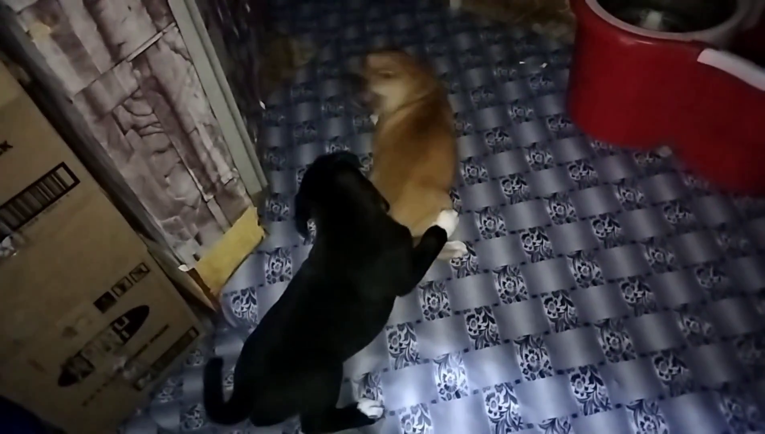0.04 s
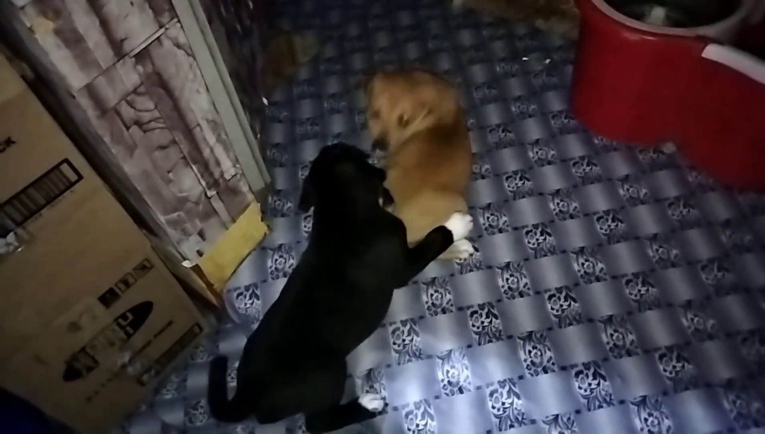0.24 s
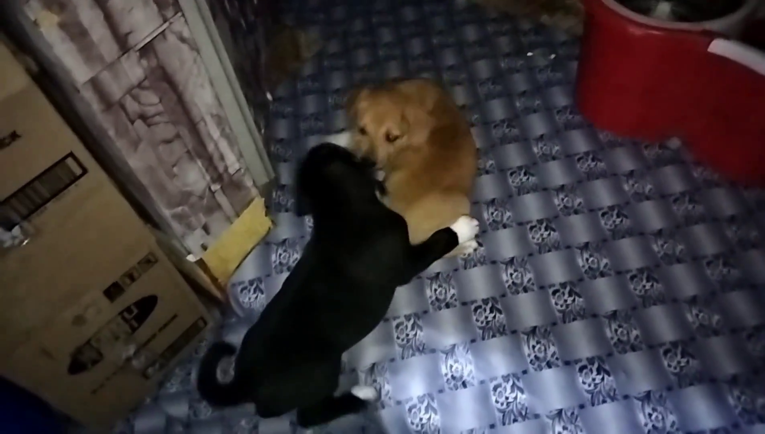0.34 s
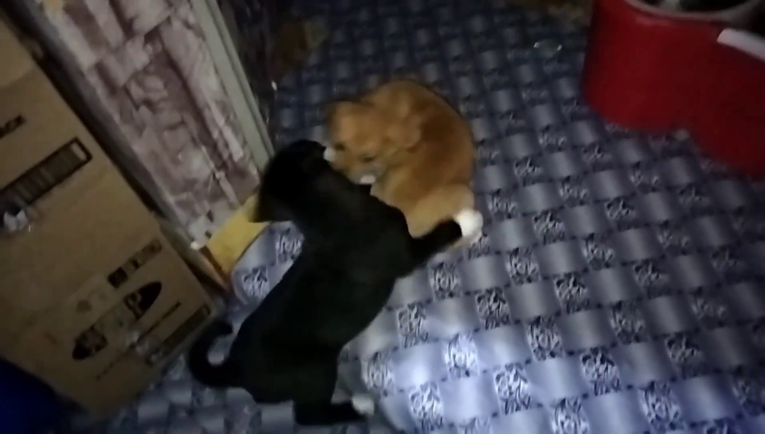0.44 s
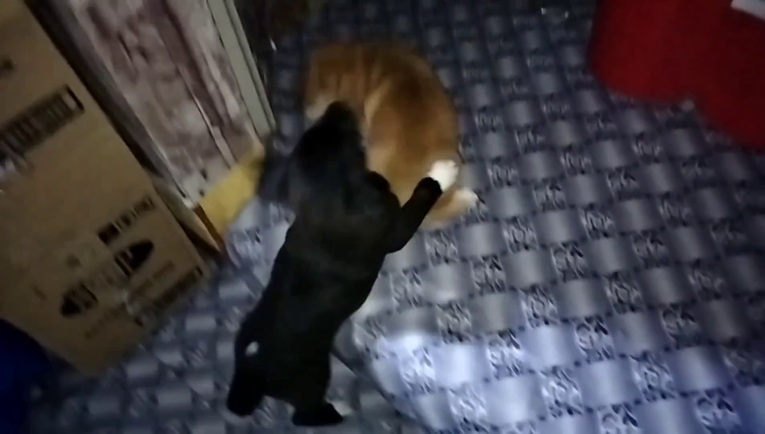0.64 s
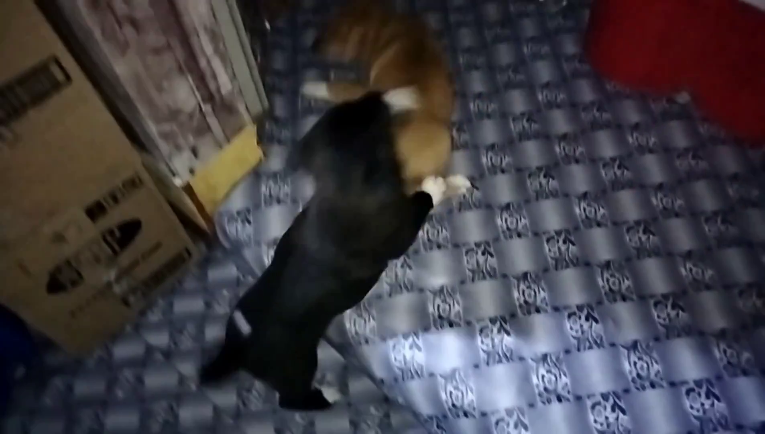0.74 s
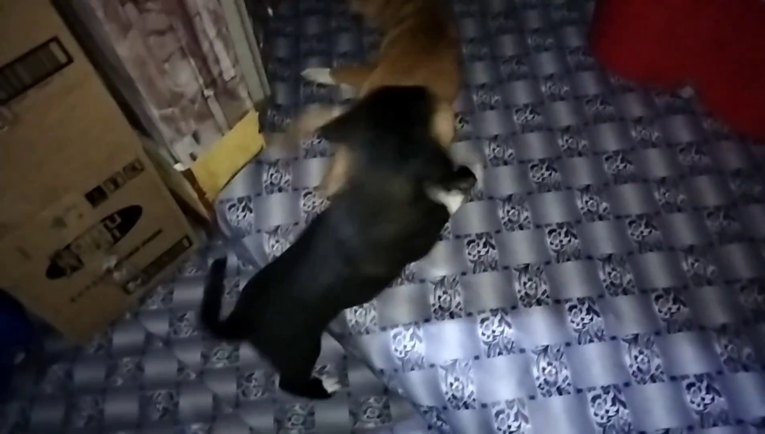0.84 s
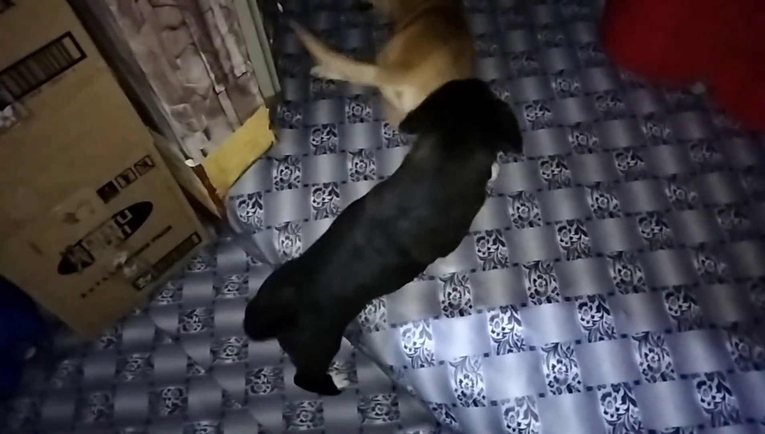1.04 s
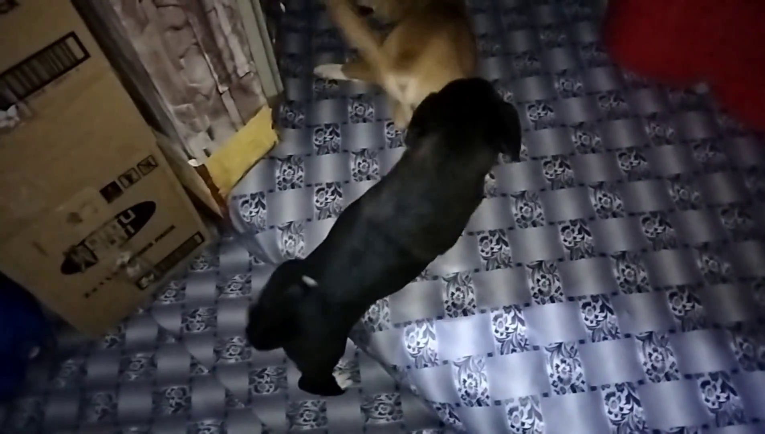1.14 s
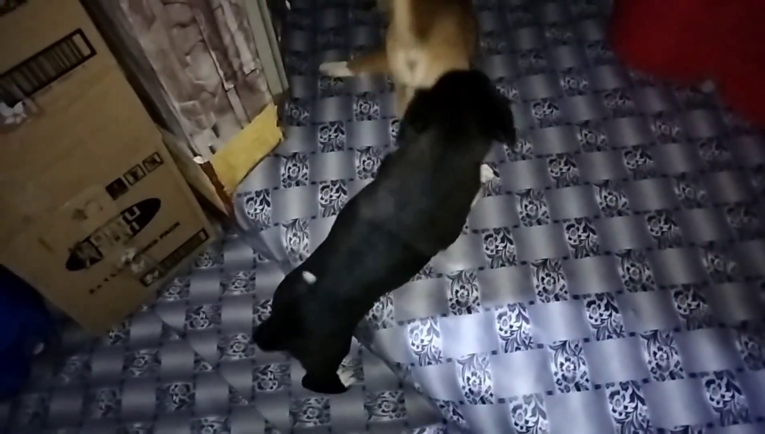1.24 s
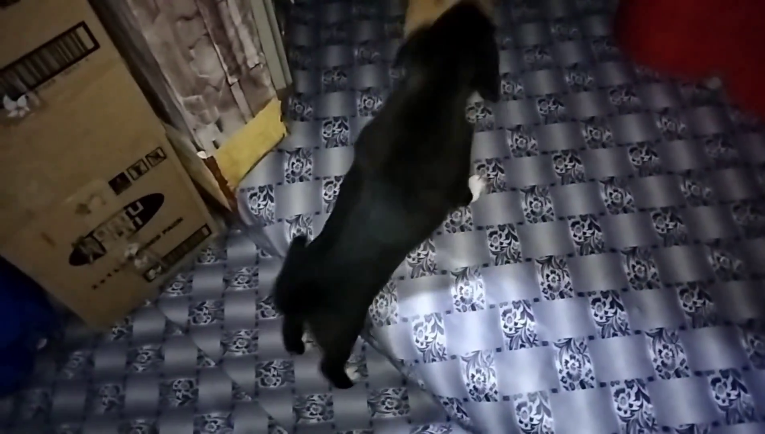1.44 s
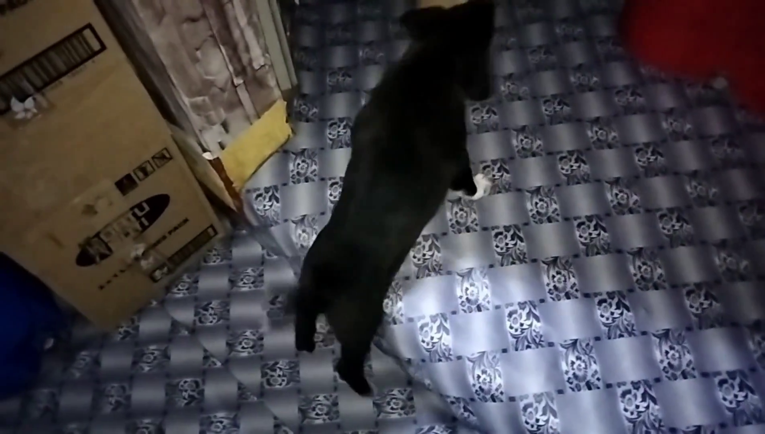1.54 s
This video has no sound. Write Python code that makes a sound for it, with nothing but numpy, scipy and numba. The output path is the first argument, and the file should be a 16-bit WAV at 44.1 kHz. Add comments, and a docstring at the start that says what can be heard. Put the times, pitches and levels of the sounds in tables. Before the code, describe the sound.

A dog's loud, raspy yip bursts out at about 0.2 seconds and is over by 0.33, falling slightly in pitch. A much quieter, rattling growl runs from 0.5 to 0.8, then an airy gasp with a low dog murmur, and a softer growl from 1.0 to 1.27. Faint scuffs and claw ticks dot the floor throughout, over soft room hiss and low hum, with short reflections.

```python
"""Dogs wrestling indoors

Two dogs on a vinyl floor in a small room, close to a phone: one rasping yip, then two rough growls
with a gasp of air and a low murmur between them. Voices are uneven fold pulses and breath through
gliding resonances; paws and fur scuff as gritty shaped noise; claws tick as short noise bursts.
Shaped hiss and wavering sines make the room tone and mains hum; decaying noise makes the reflections.
"""
import sys
import numpy as np
from scipy import signal
from scipy.fft import rfft, irfft, next_fast_len
from scipy.io import wavfile
from scipy.ndimage import map_coordinates
from numba import njit

SR = 44100
rng = np.random.default_rng(int(sys.argv[2]) if len(sys.argv) > 2 else 0)


def linear_from_db(decibels):
    """Turn decibels (scalar or array-like) into linear amplitude factors; 0 gives 1."""
    return 10 ** (np.asarray(decibels, float) / 20)


def generate_wav(sig):
    """Save sig (samples, or channels by samples) to the path in sys.argv[1] as 16-bit PCM at SR."""
    pcm = np.round(np.clip(np.atleast_2d(sig).T, -1, 1) * 32767).astype(np.int16)
    wavfile.write(sys.argv[1], SR, pcm)


N = 70560

# Slow swell of hiss and hum. Each row: time in seconds, hiss level in dB; hum follows about the mean.
BACKGROUND_SWELL = [(0, -56), (0.299, -54.5), (.5, -52), (1.0, -51.5), (1.35, -52.5), (1.6, -53)]
# Hiss spectrum. Each row: frequency in Hz, relative density in dB per Hz.
HISS_SPECTRUM = [(15, -1), (25, -1), (50, -12.5), (90, -11), (200, -12), (800, -17), (1600, -18.5),
                 (3500, -26.5), (5500, -26), (8700, -26.5), (10500, -29.5), (12400, -73)]
# Mains hum partials. Each row: frequency in Hz, rms level in dB at the mean swell.
HUM_PARTIALS = [(59.2, -57), (118.4, -63.5)]
# Decay of the walls' answer. Each row: frequency in Hz, T60 in seconds.
WALL_DECAY = [(200, 0.18), (2000, 0.22), (5000, 0.16), (10000, 0.19)]
# Claw ticks. Each row: time in seconds, nominal level in dB (the noise starts 7.5 dB lower).
CLAW_TICKS = [(0.4225, -36), (0.8296, -43), (0.8886, -33), (1.5535, -40)]
# Paws and fur dragged over the floor. Each row: start in seconds, length in seconds, level in dB.
DRAGS = [(-.02, 0.028, -54.5), (0.354, 0.023, -58), (0.422, 0.019, -58), (0.487, 0.013, -42),
         (0.501, 0.019, -41), (1.36, 0.028, -44.5), (1.395, .012, -44), (1.407, 0.02, -40),
         (1.219, 0.023, -51), (1.511, 0.011, -60), (1.561, 0.025, -55.5)]
# Scuff spectrum. Each row: frequency in Hz, relative density in dB per Hz.
SCUFF_SPECTRUM = [(1180, -19), (2000, -23), (2730, -14), (4220, -5.5), (5310, -1), (6280, -4.5),
                  (8920, 4.5), (10100, 2), (12400, -16.5), (16100, -63), (22000, -120)]

# Calls. Each row: time in seconds, level in dB, mean pitch in Hz.
YIP_CALL = [(.19, -23, 389.7), (.1925, -41, 387.3), (.205, -31.5, 392), (.209, -25.5, 385.1),
            (.225, -17, 374.8), (.245, -16.5, 362.1), (.262, -16.5, 362.1), (.285, -26, 357),
            (.305, -36.5, 364.5), (.335, -60, 339)]
GROWL_A_CALL = [(0.51, -56, 197.9), (0.53, -39, 203.9), (0.564, -33, 228.6), (0.586, -33, 226.7),
                (0.616, -36.5, 212.4), (0.636, -33.5, 207.4), (0.69, -35.5, 217.6), (0.73, -36.5, 197.7),
                (0.762, -38, 198), (0.797, -51.5, 198.5)]
GASP_CALL = [(.825, -71, 300), (.838, -46, 300), (.85, -50, 300), (.866, -69, 300), (.872, -40.5, 300),
             (.9, -45.5, 300), (.97, -49, 300), (1.005, -51, 300)]
MURMUR_CALL = [(.815, -60, 150), (.85, -50.5, 149.4), (.95, -56.5, 171.9), (1.0, -46.5, 178),
               (1.03, -60, 183)]
GROWL_B_CALL = [(1.0, -70, 174.5), (1.02, -43.5, 180.4), (1.05, -42, 184.4), (1.09, -40.5, 199.8),
                (1.126, -42.5, 203), (1.142, -38.5, 208), (1.156, -42.5, 214.5), (1.204, -41, 211.3),
                (1.27, -59, 186.3)]
# Throat and mouth resonances, gliding over the call. Each row: start in Hz, end in Hz, width in Hz,
# relative start level in dB, relative end level in dB.
YIP_RESONANCES = [(300, 350, 270, -0.5, -53), (383, 445, 92, -48.5, -4), (727, 680, 33, -19, -14),
                  (1240, 1047, 55, -10.5, -14), (1240, 1490, 153, -2.5, -9.5), (1270, 2392, 118, 3.5, -3),
                  (1860, 2170, 104, -6.5, 1.5), (3010, 2595, 170, -5.5, -0.5),
                  (3300, 3250, 170, -11, -10.5), (3760, 4230, 376, -11.5, -11),
                  (5540, 8320, 490, -54, -7.5), (9030, 10800, 590, 0.5, -41.5)]
GROWL_A_RESONANCES = [(197, 180, 250, -3, -11.5), (410, 307, 127, -2, 4.5), (633, 610, 75, -0.5, -17.5),
                      (1100, 990, 170, -5.5, 1.5), (1034, 1590, 100, 2.5, 4.5), (1410, 1660, 59, 1, -7.5),
                      (2770, 2900, 330, -6, -26.5), (3720, 3540, 600, -14, -18.5),
                      (4600, 4600, 510, -39, -36), (6300, 6900, 600, -22, -6), (8200, 8350, 750, -24, -14)]
GASP_RESONANCES = [(1424, 1760, 280, 6.5, -22), (2995, 3800, 770, -4, -13.5), (3980, 4700, 330, -3, -9),
                   (8300, 7000, 740, -10, -4), (9750, 9270, 810, -4, 0.5)]
MURMUR_RESONANCES = [(149, 280, 120, -2.5, -0.5), (300, 330, 91, 4, 1)]
GROWL_B_RESONANCES = [(179, 120, 106, 3, -3), (420, 470, 140, -1, -1.5), (627, 670, 150, -5, -4),
                      (1425, 1640, 230, -4.5, -3.5), (3020, 2900, 500, -10, -19.5),
                      (3840, 3830, 260, -15, -9), (8930, 7600, 1200, -14, -21)]
# Throat catches and slaps open. Each row: time in seconds, boost in dB before scaling per resonance.
THROAT_CATCHES = [(.6, 6), (.6145, 8), (.6808, 15), (.6942, 13), (.7045, 7), (.7102, 14), (1.145, 6),
                  (1.202, 3)]
# Unruly folds. Each row: nominal breath share, pitch jitter share, pulse scatter in dB,
# flutter rate in Hz, nominal flutter depth in dB.
YIP_FOLDS = (.33, .04, 1.5, 130, 6)
GROWL_FOLDS = (.62, .05, 1.8, 68, 4.5)
GASP_FOLDS = (.9, .2, 3, 60, 3)
GRUMBLE_FOLDS = (.58, .04, 1.2, 55, 6.5)


def unit(x):
    """Scaled to rms 1."""
    return x / np.sqrt(np.mean(x ** 2) + 1e-20)


def wobble(knots_per_s):
    """Smooth random curve through normal-distributed knots."""
    return map_coordinates(rng.standard_normal(1000), [np.arange(N) * knots_per_s / SR])


def coloured(x, spectrum):
    """x filtered through (Hz, dB) points on a log-frequency axis, rms 1."""
    size = next_fast_len(len(x) + 8192)
    hz, db = np.transpose(spectrum)
    bins_hz = np.fft.rfftfreq(size, 1 / SR)
    gain = linear_from_db(np.interp(np.log(bins_hz + 1), np.log(hz + 1), db))
    return unit(irfft(rfft(x, size) * gain, size)[:len(x)])


def background():
    """Shaped room hiss plus mains partials of wavering level, swelling together."""
    hum_waver_db = 0.5
    t = np.arange(N) / SR
    s, db = np.transpose(BACKGROUND_SWELL)
    swell_db = np.interp(t, s, db)
    hum = 0
    for hz, rms_db in HUM_PARTIALS:
        level = np.sqrt(2) * linear_from_db(rms_db + hum_waver_db * wobble(8.7))
        hum = hum + level * np.sin(2 * np.pi * (hz * t + rng.random()))
    hiss = coloured(rng.standard_normal(N), HISS_SPECTRUM)
    return linear_from_db(swell_db) * hiss + linear_from_db(swell_db - db.mean()) * hum


def room(x):
    """Wall reflections: delayed noise whose frequencies each die at their own speed."""
    wall_delay_s = .006
    hz, t, bins = signal.stft(rng.standard_normal(SR // 2), SR, nperseg=256)
    decay_hz, t60_s = np.transpose(WALL_DECAY)
    decay = linear_from_db(-60 * t / np.interp(hz, decay_hz, t60_s)[:, None])
    tail = signal.istft(bins * decay, SR, nperseg=256)[1]
    delayed = np.pad(x, (round(wall_delay_s * SR), 0))
    return signal.fftconvolve(delayed, tail / np.linalg.norm(tail))[:N]


def doorway_echo(x):
    """Dull late answer from beyond the doorway: reflections delayed and low-passed."""
    delay_s, top_hz = .115, 3300
    delayed = np.pad(room(x), (round(delay_s * SR), 0))[:N]
    return signal.lfilter(*signal.butter(2, top_hz, fs=SR), delayed)


def claws():
    """Tiny dry ticks on the vinyl: decaying coloured noise."""
    t60_s = 0.019
    spectrum = [(500, -38), (3000, -4), (9000, 0.0), (12000, -19)]
    out, t = np.zeros(N), np.arange(1000) / SR
    for s, db in CLAW_TICKS:
        tick = coloured(rng.standard_normal(len(t)), spectrum)
        out[round(s * SR):][:len(t)] += linear_from_db(db - 7.5 - 60 * t / t60_s) * tick
    return out


def scuffs():
    """Friction of paws and fur: sparse grit in hiss, with quick rise, hold and fall per drag."""
    rise_s, fall_s, grit_per_s, grit_db = 0.0065, 0.0039, 3500, -1.5
    t = np.arange(N) / SR
    stroke = 0
    for s, length_s, db in DRAGS:
        rise = np.clip((t - s) / rise_s, 0, 1)
        fall = np.exp(-np.clip(t - s - length_s, 0, None) / fall_s)
        stroke = stroke + linear_from_db(db) * rise * fall
    grains = rng.random(N) < grit_per_s / SR
    grit = grains * linear_from_db(grit_db * rng.exponential(1, N)) * rng.standard_normal(N)
    unevenness = linear_from_db(1.6 * wobble(180))
    scrape = coloured(unit(grit) + rng.standard_normal(N), SCUFF_SPECTRUM)
    return stroke * unevenness * scrape


@njit
def resonate(x, turn, radius):
    """Band-pass resonance of peak gain about 1 whose centre moves sample by sample."""
    y = np.zeros(len(x))
    for i in range(2, len(x)):
        drive = (1 - radius) * (x[i] - x[i - 2])
        y[i] = drive + 2 * radius * np.cos(turn[i]) * y[i - 1] - radius * radius * y[i - 2]
    return y


def throat_flutter(rate_hz, depth_db):
    """Level in dB of a throat that slaps open and sags shut, with extra catches."""
    catch_s = .004
    t = np.arange(N) / SR
    phase = np.cumsum(rate_hz * (1 + .18 * wobble(25))) / SR % 1
    flutter_db = depth_db * (1 - 2 * phase)
    for when, boost_db in THROAT_CATCHES:
        flutter_db = flutter_db + boost_db * (t > when) * np.exp(-((t - when) / catch_s) ** 2)
    return flutter_db


def voice(call, mouth, folds, opening=1.0):
    """Uneven vocal-fold pulses and breath gated once a cycle, through gliding resonances."""
    breathy_above_hz, steady_below_hz, patchy_db = 3500, 250, 1.8
    s, db, hz = np.transpose(call)
    noisy, jitter, scatter_db, flutter_hz, flutter_depth_db = folds
    t = np.arange(N) / SR
    cycles = np.cumsum(np.interp(t, s, hz) * (1 + jitter * wobble(150))) / SR
    flutter_db = throat_flutter(flutter_hz, flutter_depth_db)
    pulse_size = linear_from_db(scatter_db * rng.standard_normal(N)[cycles.astype(int)])
    pulses = unit(np.diff(np.floor(cycles), prepend=0) * pulse_size)
    puff = .8 + np.exp(-3 * (cycles % 1))
    glide = np.interp(t, s[[0, -1]], [0, 1]) ** opening
    out = 0
    for k, (start_hz, end_hz, width_hz, start_db, end_db) in enumerate(mouth):
        breath = unit(rng.standard_normal(N) * puff)
        # low resonances clearer and steadier, high ones mostly breath
        unsteady = start_hz / (start_hz + steady_below_hz)
        clear = (1 - noisy * np.sqrt(unsteady)) / (1 + (start_hz / breathy_above_hz) ** 2)
        # breath rattles most; each resonance also comes and goes by itself
        rattle_db = (2 - clear) / 2 * flutter_db + patchy_db * wobble(39.7)
        source = np.sqrt(clear) * pulses + np.sqrt(1 - clear) * breath
        source = source * linear_from_db(unsteady * rattle_db)
        turn = 2 * np.pi * (start_hz + (end_hz - start_hz) * glide) / SR
        ring = resonate(source, turn, np.exp(-np.pi * abs(width_hz) / SR))
        out = out + (-1) ** k * linear_from_db(start_db + (end_db - start_db) * glide) * ring
    during = (t > s[0]) & (t < s[-1])
    edges = np.clip(np.minimum(t - s[0], s[-1] - t) / .002, 0, 1)
    return out / np.std(out[during]) * linear_from_db(np.interp(t, s, db)) * edges


def scene():
    """Dogs and floor with room reflections and doorway echo, over the background."""
    room_db, echo_db = -9, -27
    parts = [voice(YIP_CALL, YIP_RESONANCES, YIP_FOLDS, opening=0.61),
             voice(GROWL_A_CALL, GROWL_A_RESONANCES, GROWL_FOLDS),
             voice(GASP_CALL, GASP_RESONANCES, GASP_FOLDS),
             voice(GROWL_B_CALL, GROWL_B_RESONANCES, GRUMBLE_FOLDS),
             voice(MURMUR_CALL, MURMUR_RESONANCES, GRUMBLE_FOLDS),
             scuffs() + claws()]
    late = doorway_echo(sum(parts))
    near = sum(part + linear_from_db(room_db) * room(part) for part in parts)
    mix = near + linear_from_db(echo_db) * late + background()
    return mix[None]


def roll_off(x):
    """The treble ends steeply here."""
    return signal.sosfilt(signal.butter(12, 12530, fs=SR, output="sos"), x)


def record(dry):
    """Phone microphone: its port cancels part of a band, its treble rolls off steeply."""
    port_hz, port_width_hz, port_db, top_hz = 5500, 750, -6, 9860
    size = next_fast_len(N + 8192)
    hz = np.fft.rfftfreq(size, 1 / SR)
    port_dip = linear_from_db(port_db * np.exp(-((hz - port_hz) / port_width_hz) ** 2))
    rolloff = 1 / np.sqrt(1 + (hz / top_hz) ** 18)
    mix = irfft(rfft(dry, size) * port_dip * rolloff, size)[:, :N]
    return roll_off(mix)


dry = scene()
out = record(dry)
generate_wav(out)
```